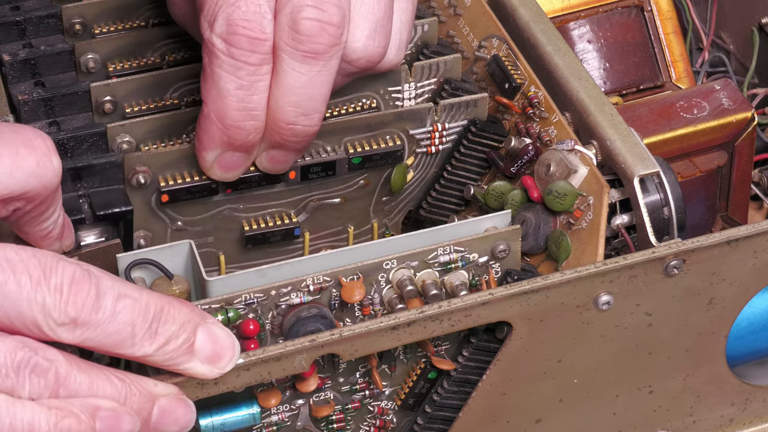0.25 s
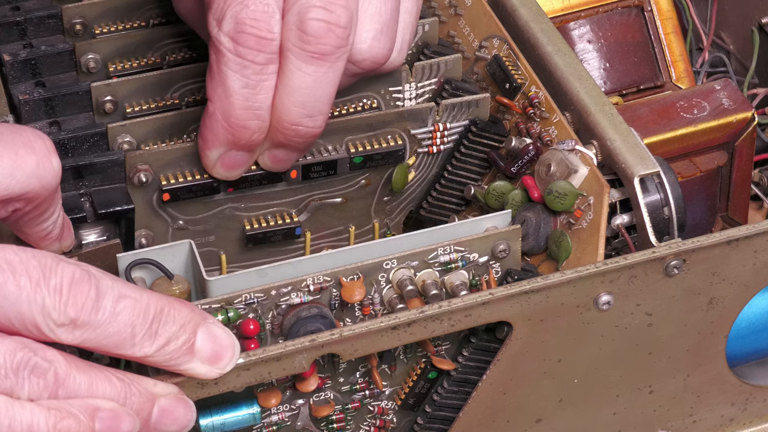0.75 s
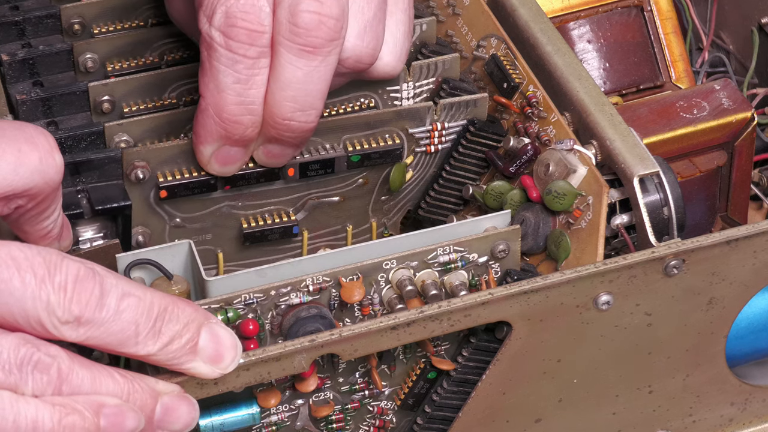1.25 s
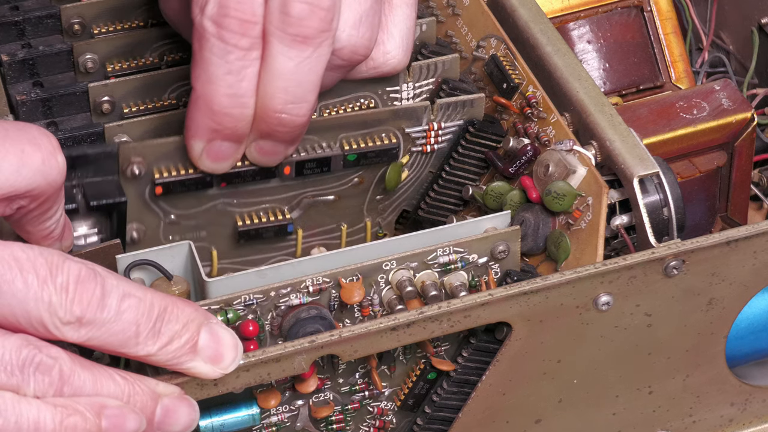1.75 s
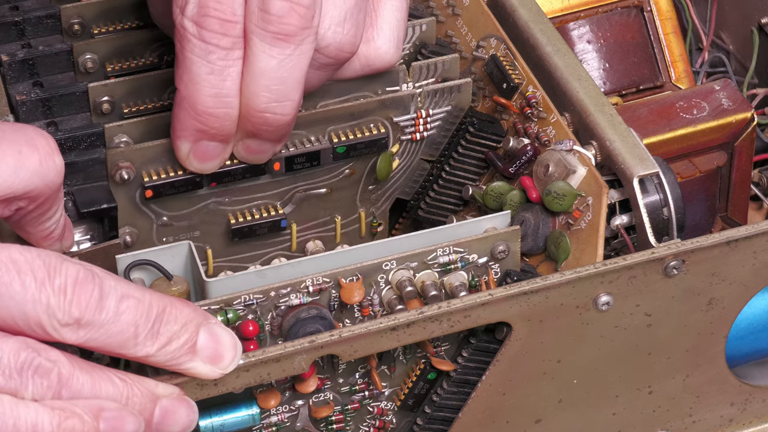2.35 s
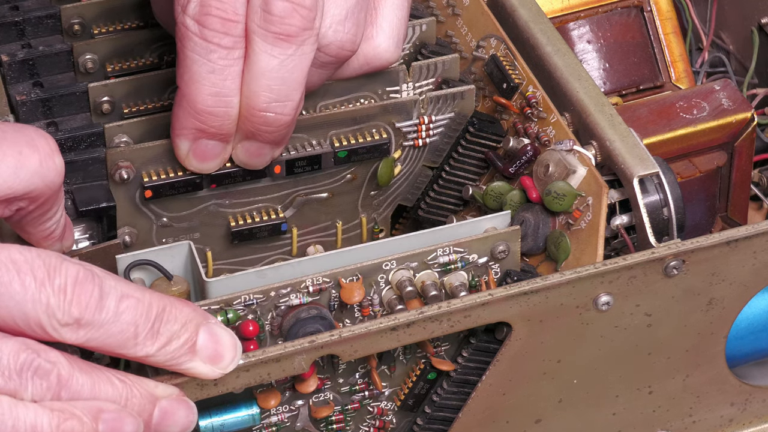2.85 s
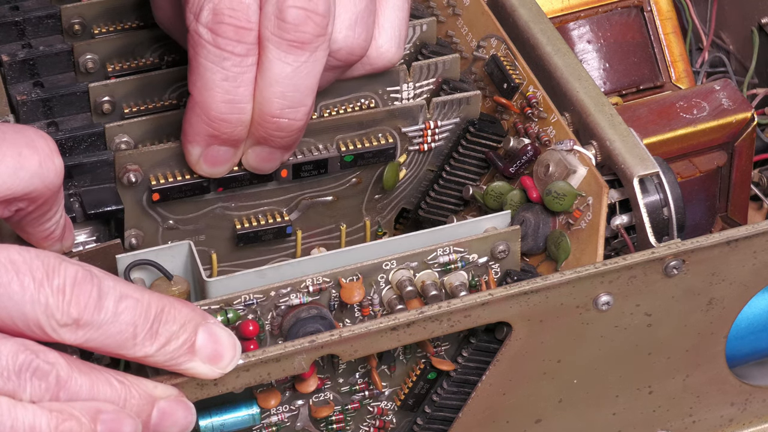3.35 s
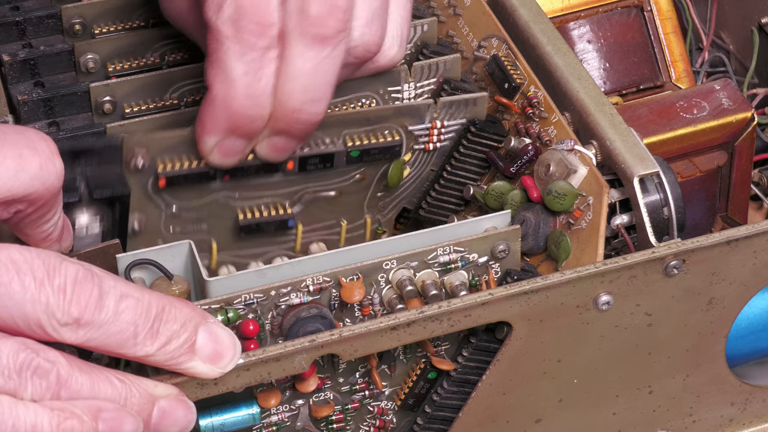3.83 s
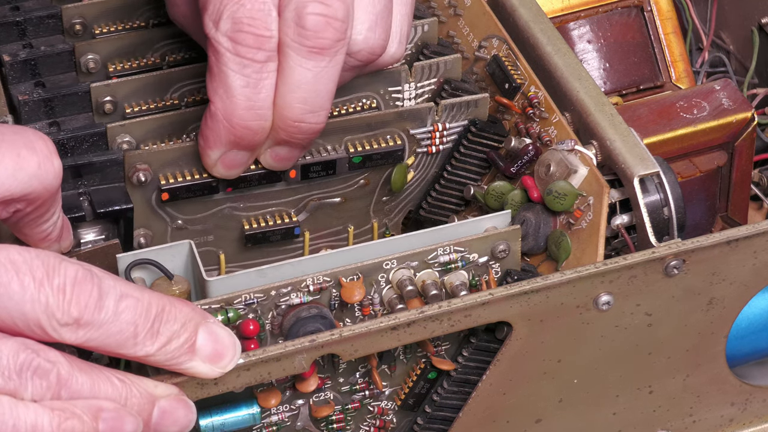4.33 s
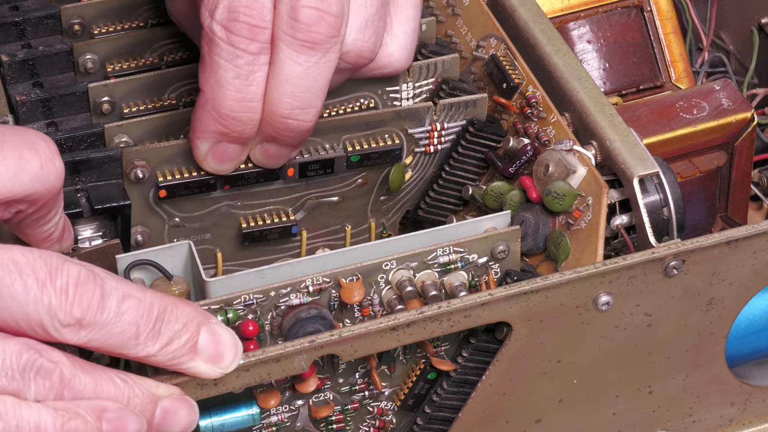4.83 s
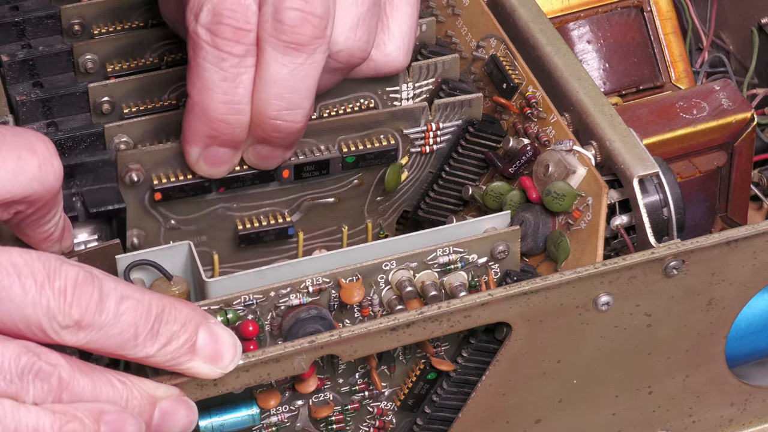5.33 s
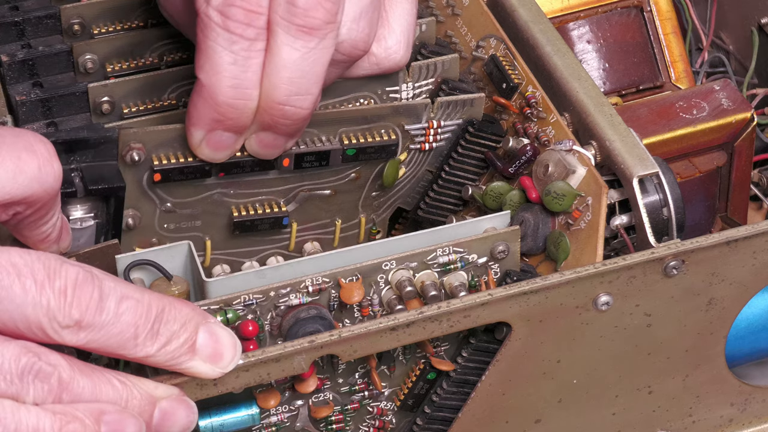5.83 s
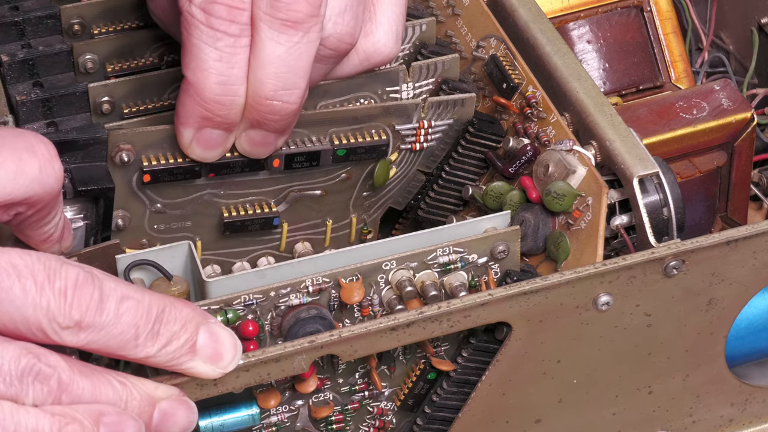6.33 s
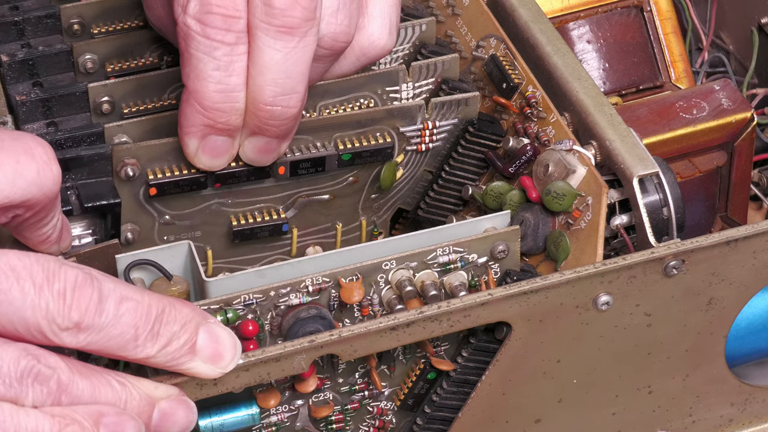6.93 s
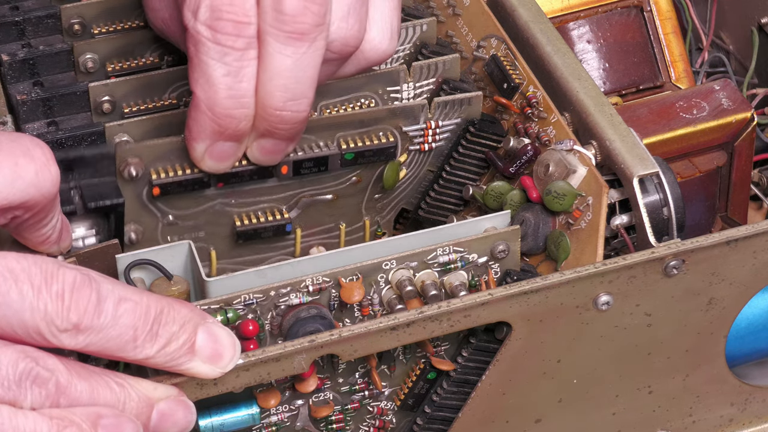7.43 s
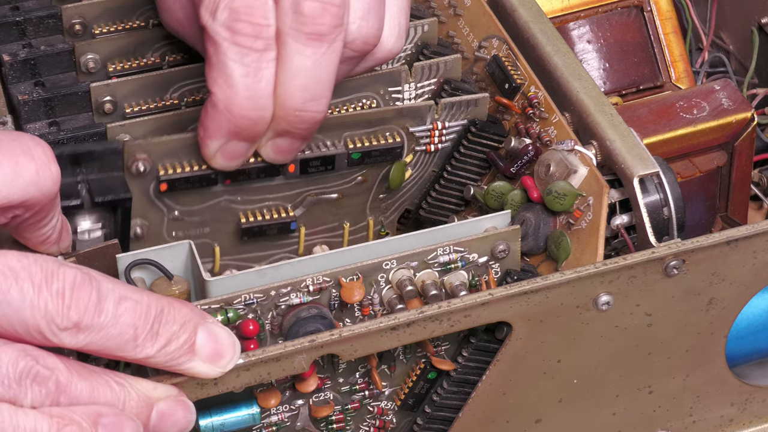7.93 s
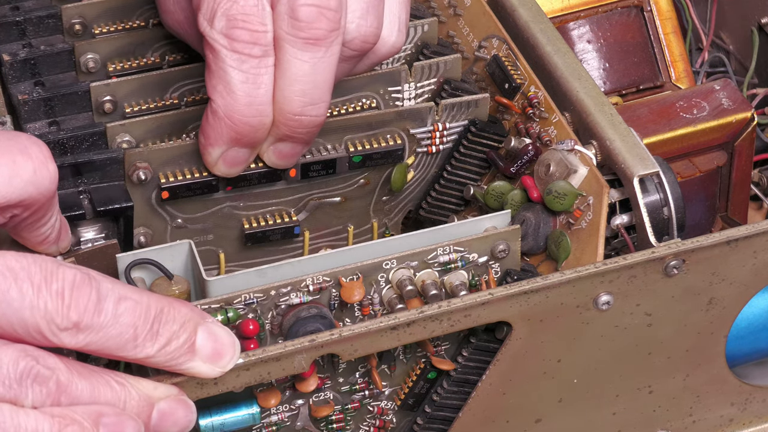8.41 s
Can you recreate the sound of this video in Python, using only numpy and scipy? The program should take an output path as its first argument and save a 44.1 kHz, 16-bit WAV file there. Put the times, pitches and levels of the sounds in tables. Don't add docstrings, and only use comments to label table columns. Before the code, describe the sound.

Quiet, detailed handling of a circuit card: an opening knock and squeak, then scattered taps, clusters of chirpy squeaks with gritty scraping, and sharp little clicks as contacts let go. The busiest squeaking comes before six seconds and again past seven. Recorded close with thin bass and a short small-room echo, over soft continuous fan air and electrical hum.

```python
import sys
import numpy as np
from scipy import signal
from scipy.fft import rfft, irfft, next_fast_len
from scipy.io import wavfile
from scipy.ndimage import uniform_filter1d

SR = 44100
rng = np.random.default_rng(int(sys.argv[2]) if len(sys.argv) > 2 else 0)


def to_wav(s):
    ch = np.atleast_2d(s).T
    pcm = np.round(np.clip(ch, -1, 1) * 32767)
    wavfile.write(sys.argv[1], SR, pcm.astype(np.int16))


def gain_from_decibels(decibels):
    exponent = np.asarray(decibels, float) / 20
    return 10 ** exponent


N = 382344

# start in seconds, length in seconds, slip rate at start in Hz, at end in Hz, peak in dB.
SWELLS = [
    (3.512, 0.045, 3350, 3260, -53),
    (7.48, 0.0291, 2193, 2373, -33.5),
    (1.962, 0.013, 3500, 3450, -44),
    (7.62, 0.036, 3450, 3390, -34.5),
]
EASES = [
    (0.125, 0.046, 2418, 2570, -37),
    (1.737, 0.029, 2421, 2317, -31.5),
    (3.984, 0.036, 2600, 2433, -31.5),
]
HOLDS = [
    (1.611, 0.034, 3563, 3206, -33.5),
    (1.765, 0.008, 2320, 2240, -33),
    (3.546, 0.016, 3320, 3060, -43),
    (5.078, .016, 3333, 3330, -31),
    (5.289, 0.014, 2300, 2440, -38.5),
    (7.665, .014, 3160, 3380, -41),
    (7.678, .016, 3470, 3340, -36.5),
]
JERKS = [(0.168, 0.029, 2496, 2550, -47), (1.345, 0.044, 3630, 3500, -51.5), (1.64, 0.034, 3410, 3210, -41),
         (1.974, 0.028, 3436, 3220, -34.5), (3.884, .02, 3300, 3360, -49.5),
         (4.41, 0.029, 3260, 3190, -59.5), (4.76, 0.025, 3200, 2900, -45), (4.782, .016, 2680, 2480, -56),
         (5.071, 0.012, 3310, 3450, -39), (5.098, 0.022, 3260, 3200, -43.5),
         (5.262, 0.013, 2600, 2400, -44), (5.303, 0.014, 2400, 2270, -56),
         (5.396, 0.021, 3500, 3400, -43.5), (5.407, 0.02, 3395, 3340, -42.5),
         (7.276, 0.04, 3470, 3250, -33), (7.694, 0.029, 3290, 3325, -41), (7.933, 0.03, 3560, 3360, -51),
         (7.97, 0.03, 3464, 3370, -47), (8.18, 0.025, 3240, 3360, -50.5), (4.014, 0.02, 2700, 2670, -42),
         (7.785, 0.023, 2597, 2650, -49)]
DOUBLES = [
    (2.112, 0.0215, 2156, 2240, -47),
    (5.271, 0.0198, 2063, 2210, -43.5),
    (7.47, 0.0108, 1735, 2130, -53.5),
]
# start in seconds, length in seconds, slip rate at the ends in Hz,
# lowest slip rate in Hz, peak in dB.
BENDS = [
    (5.162, 0.052, 2540, 2326, -29.5),
]
WHISTLES = [
    (1.782, .04, 2350, 2725, -42.5),
    (2.092, 0.023, 2740, 2500, -48.5),
    (3.635, 0.043, 2450, 2730, -56),
    (5.9, 0.056, 2480, 2470, -44.5),
    (6.89, 0.065, 2480, 2520, -65),
]
PRESSES = [
    (5.733, 0.024, 2545, 2394, -33.5),
    (5.832, 0.0364, 2805, 2420, -32),
    (5.759, .009, 2430, 2400, -46),
]
DRAGS = [
    (2.131, 0.026, 2255, 2240, -39),
    (3.872, 0.013, 3250, 3200, -39),
    (3.909, 0.014, 2400, 2330, -40),
]
# share of length spent rising, start in dB re peak, end in dB re peak,
# octave lift in dB, lift above the octave in dB, roughness factor, beating factor.
SWELL = (1.8, -14, -5, -1.5, 6, 1.3, 0.6)
EASE = (0.5, -20, -1, 1, -2.2, 1.34, 0.35)
HOLD = (2.5, -0.5, -3, 1.5, 2.2, 1, 0.7)
JERK = (0.36, -4, -18, 3.5, 0.6, 1.33, 1.06)
DOUBLE = (1.6, -5.5, -5.5, 21.5, 0, 2, 1)
BEND = (0.3, -19, 0, 0.5, 2.5, 0.6, 1)
WHISTLE = (2.2, -10, -4, -11, 0.1, 2.2, 0)
PRESS = (1, -21, -1.5, 2.5, -1, 1.6, 0.8)
DRAG = (-2, -2, -1, 3, -0.5, 2.06, 0.5)
OVERTONES_DB = ((-3.5, -16), (-9.5, -16))
UPPER_STEP_DB = (-9, -6.0)
FLUTTER_SHARE, BEATING_SHARE = (0.13, 0.31), (0.3, 0.36)
WOBBLE_SHARE = (0.005, 0.013)
SPRING_SPLIT_HZ, REFERENCE_DB = 2900, -33
BRIGHTENS_DB_PER_DB = (0.71, 0.99)
BEAT_HZ, FIRST_BEAT_S = 110.7, 0.0067
RISE_CURVE = 1.43
SETTLES = 0.847
EASED_FALL, REBOUND_SHARE = 2.44, 0.19

# start in seconds, length in seconds, hiss in dB,
# chatter in Hz, chatter in dB.
SCRAPES = [(0.215, .026, -69, 2200, -60), (1.597, 0.0096, -61, 3630, -38), (1.825, 0.095, -74, 2450, -57),
           (4.022, 0.052, -60, 2500, -56), (6.069, 0.048, -65, 3000, -58), (6.769, 0.1, -75.5, 2040, -69.5),
           (7.6, 0.12, -77.5, 2800, -68), (7.467, 0.034, -58, 1767, -51), (7.781, 0.076, -64, 2530, -52.5),
           (8.064, 0.057, -68, 2660, -59), (8.322, 0.037, -68.5, 3000, -72), (7.445, .022, -72, 3000, -75),
           (5.724, .04, -54, 2500, -59), (3.868, .05, -61, 3250, -60), (4.05, .01, -62, 2660, -70),
           (5.997, .012, -58, 2310, -64), (5.069, 0.048, -53, 2520, -62), (5.765, 0.076, -73, 2400, -66),
           (3.622, .09, -73, 2600, -75), (2.355, .06, -76, 2400, -80), (2.085, 0.047, -67, 3200, -58),
           (0.79, 0.029, -76, 1700, -64), (8.14, 0.087, -78, 2300, -61), (2.2, .05, -73, 1700, -58),
           (5.875, .085, -74, 2450, -70), (7.995, 0.036, -74, 2200, -59), (3.535, .06, -70, 2900, -63)]
SCRAPE_RISE_SHARE, SCRAPE_START_DB, SCRAPE_END_DB = 0.28, -6.5, -10
# frequency in Hz, density in dB per Hz.
RUB_SPECTRUM = [(1200, -26), (2600, -1), (3300, -8.5), (5000, -3.5), (6000, -15.5), (8500, -7),
                (9600, -24.5), (16000, -16)]

# time in seconds, board peak in dB, thud, ring and tick in dB re board.
BLOWS = [(0.008, -47.5, -10, -17, -5.5), (0.014, -50.5, -18, 7, -17), (0.233, -46.5, -2, -16, -16),
         (0.791, -47, -6.5, -24, -35), (2.177, -43.5, -16, -8.5, -29), (2.184, -43, -17, -19, -23.5),
         (2.2804, -44, -1, -3, -14.5), (2.769, -42.5, -12, -6, -27), (3.255, -43.5, -6.5, -5.5, -17.5),
         (3.714, -45, -18, -7.5, -4), (3.728, -66, -22, 6, 9), (3.864, -45, -6.5, -5.5, -17),
         (5.72, -44, -14, -0.5, -13), (5.959, -46, -23, -10, -21), (5.986, -44.5, -18.5, -7, -24),
         (6.621, -63, 1, -8, -15), (7.055, -47, -12.5, -10, -46), (7.646, -53, -3, -3, -15),
         (8.108, -45.5, -34, -13, -35), (8.134, -56, -0.5, 4, -9), (8.202, -49, -36, -20, -42),
         (5.976, -48.5, -16, -6, -20), (3.24, -58.5, -10, -13, -25), (2.756, -58, -5, -13, -16)]
BLOW_HZ = 850
# time in seconds, board peak in dB, thud and ring in dB re board, favoured board mode in Hz.
TAPS = [(0.241, -55, -26, 2, 880), (0.499, -53, -8, -37, 830), (0.636, -57.5, -14, -10, 480),
        (0.834, -64, -6, -8, 592), (1.854, -55, -21, -5, 1090), (1.951, -54.5, 1, -4, 855),
        (2.883, -54.5, -10, -19, 487), (4.144, -54.5, 1, -5.5, 550), (4.325, -47.5, -18, -34, 850),
        (4.7, -55, -21, -11.5, 859), (4.99, -60, -12, -7, 474), (5.004, -59.5, 3.5, 3, 460),
        (5.411, -49, 0.5, -5.5, 570), (5.607, -66, -4, -0.5, 468), (6.478, -53.5, -11, -18, 885),
        (7.954, -52, -6, -7.5, 895), (8.071, -53.5, -29, -13, 880), (1.196, -65, -5, -15, 850),
        (2.286, -48.5, -18, -27, 590), (5.089, -50.5, -30, -13, 850), (5.31, -53.5, -9, -3, 1030),
        (7.529, -53.5, -5, -14, 850), (7.832, -54.5, -16, -20, 870), (8.245, -55, -17, -29, 905),
        (8.082, -58, -27, -25, 880), (8.15, -57, -20, -20, 1000), (2.19, -51, -25, -15, 1130),
        (8.005, -59, -20, -20, 900)]
TAP_TICK_DB, TICK_PER_RING = -20, 0.54
# frequency in Hz, width in Hz, level in dB.
BOARD_MODES = [(261, 14, 0.5), (411.6, 21, 6.5), (592, 100, -0.5), (697, 32, -0.5), (832, 44, -0.5),
               (994, 90, 0), (1090, 24, 2.5)]
GUIDE_MODES = [(1660, 140, -3), (2400, 520, 4.5), (3500, 2080, 3.5), (5340, 1040, 1)]
PIN_MODES = [(7000, 240, 10.5), (8350, 490, 4), (10200, 920, -13), (12100, 1800, -2)]

# time in seconds, peak in dB, guide ring in dB re peak.
CRACKS = [(0.0148, -42, 6), (0.2314, -50, -4), (0.2423, -47, -4), (1.599, -52, 6), (2.1885, -50, 6),
          (2.2697, -61, -6), (2.2817, -38, 4), (2.3835, -60, -11), (2.662, -66, -10), (2.675, -63, -10),
          (3.2567, -41, 2.5), (3.511, -67, 7), (3.715, -35, -5), (3.7277, -36, -5), (3.786, -57, -10),
          (3.8645, -51, 5), (3.8700, -39.5, 7), (4.0462, -52, -1), (5.7199, -46, 8), (5.981, -53, 3),
          (5.9865, -47, 7), (5.998, -55, -3), (6.07, -59, 0), (6.479, -57.5, -6), (7.2165, -64, -3),
          (7.647, -43, 2), (7.955, -65, 6), (8.109, -57, 10), (8.134, -51, 5), (8.205, -63, 8),
          (8.328, -70, 9)]
SNAP_DECAY_S, GUIDE_DECAY_S = 0.001, 0.0023

# frequency in Hz, level in dB rms.
HUM_LINES = [(150.7, -74), (199.2, -75), (468, -70), (1277, -82.5), (1864, -92), (1339.3, -71.5),
             (2054, -81), (2143, -78.5), (2270, -90), (2412, -86), (3180, -93), (3530, -87.5)]
# frequency in Hz, density in dB per Hz.
AIR_SPECTRUM = [(53, -84), (90, -15), (139, -11), (284, -3.5), (429, -11.5), (467, -7.5), (499, -7),
                (1140, -12.5), (1380, -19), (1790, -19.5), (2090, -17.5), (2590, -24.5), (3590, -25.5),
                (6030, -33), (8000, -37.5), (9400, -34.5), (11000, -40), (14600, -38), (15300, -32),
                (16000, -33)]
AIR_DB = -61.5

ROOM_T60_S, WALL_CUT_HZ, ROOM_DB = 0.16, 6500, -14.5
DUCK_FROM_DB, DUCK_SHARE, RECOVER_DB_PER_S = -34.5, 0.87, 21.5


def squeaks(fade_s=0.0019, rub_db=-18.0, rub_tail_s=0.01):
    tone, pressure = np.zeros(N), np.zeros(N)
    jitter, flutter = drift(170), [drift(99) for k in range(3)]
    for short, rough, beats, s, slip_hz, *partial_db in strokes():
        at = np.arange(round(s[0] * SR), round(s[-1] * SR))
        t = at / SR
        gate = np.clip(np.minimum(t - s[0], s[-1] - t) / fade_s, 0, 1)
        beat = np.cos(2 * np.pi * BEAT_HZ * (t - s[0] - FIRST_BEAT_S))
        gate = gate * (1 + beats * BEATING_SHARE[short] * beat)
        rate_hz = np.interp(t, s, slip_hz) * (1 + rough * WOBBLE_SHARE[short] * jitter[at])
        phase = 2 * np.pi * np.cumsum(rate_hz) / SR
        levels = [np.interp(t, s, db) for db in partial_db]
        levels += [levels[2] + UPPER_STEP_DB[short] * k for k in (1, 2, 3)]
        levels[3] = np.maximum(levels[3], levels[1] + 2 * (levels[1] - levels[0]) - 28.0)
        for k, db in enumerate(levels):
            if (k + 1) * slip_hz.max() < 16000:
                strength = np.sqrt(2) * gain_from_decibels(db) * (1 + FLUTTER_SHARE[short] * flutter[k % 3][at])
                tone[at] += gate * strength * np.sin((k + 1) * phase)
        strongest_db = np.maximum(levels[0], levels[1])
        pressure[at] += gate * gain_from_decibels(-42.5 + 0.64 * (strongest_db + 39.0))
    r = np.exp(-1 / (rub_tail_s * SR))
    sliding = signal.lfilter([1 - r], [1, -r], pressure)
    return tone + gain_from_decibels(rub_db) * sliding * in_bands(rng.standard_normal(N), RUB_SPECTRUM)


def strokes():
    manners = ((SWELLS, SWELL), (EASES, EASE), (HOLDS, HOLD), (JERKS, JERK), (DOUBLES, DOUBLE),
               (BENDS, BEND), (WHISTLES, WHISTLE), (PRESSES, PRESS), (DRAGS, DRAG))
    share = np.linspace(0, 1, num=21)
    for rows, (rise, start_db, end_db, lift_db, third_db, rough, beats) in manners:
        top = np.clip(rise, .05, .95)
        rising = start_db * np.maximum(1 - share / top, 0) ** RISE_CURVE
        falling = end_db * np.maximum(share - top, 0) / (1 - top)
        for s, length, start_hz, end_hz, peak_db in rows:
            db = peak_db + rising + falling
            if rows is BENDS:
                glide = np.sin(np.pi * share)
            elif (rows is EASES or rows is PRESSES) and end_hz < start_hz:
                glide = 1 - (1 - share) ** EASED_FALL - REBOUND_SHARE * share ** 4
            else:
                glide = share ** SETTLES
            short = int(start_hz > SPRING_SPLIT_HZ)
            second, third = [db + re_db + lift_db + per_db * np.minimum(db - REFERENCE_DB, 0)
                             for re_db, per_db in zip(OVERTONES_DB[short], BRIGHTENS_DB_PER_DB)]
            slip_hz = start_hz + (end_hz - start_hz) * glide
            yield short, rough, beats, s + length * share, slip_hz, db, second, third + third_db


def scrapes():
    hiss, chatter, rough = np.zeros(N), np.zeros(N), drift(220)
    shape_db = np.array([SCRAPE_START_DB, 0, SCRAPE_END_DB])
    for start, length, hiss_db, hz, chatter_db in SCRAPES:
        s = start + length * np.array([0, SCRAPE_RISE_SHARE, 1])
        at = np.arange(round(s[0] * SR), round(s[-1] * SR))
        t = at / SR
        gate = np.clip(np.minimum(t - s[0], s[-1] - t) / 0.0023, 0, 1)
        hiss[at] = gate * gain_from_decibels(np.interp(t, s, hiss_db + shape_db))
        chatter_gain = gate * gain_from_decibels(np.interp(t, s, chatter_db + 2 * shape_db))
        chatter[at] = chatter_gain * rough[at] * np.sin(2 * np.pi * hz * t)
    grit = rng.standard_normal(N) * gain_from_decibels(1.8 * drift(45))
    return gain_from_decibels(3.5) * hiss * in_bands(grit, RUB_SPECTRUM) + gain_from_decibels(3.5) * chatter


def knocks():
    grains = rng.standard_normal(N) * gain_from_decibels(2.5 * np.minimum(rng.exponential(1, N), 4))
    modes = np.array(BOARD_MODES + GUIDE_MODES + PIN_MODES)
    part = np.repeat([1, 2, 3], [len(BOARD_MODES), len(GUIDE_MODES), len(PIN_MODES)])
    drive, struck = np.zeros((4, N)), np.zeros((len(modes), N))
    hits = [(*row, BLOW_HZ) for row in BLOWS]
    hits += [(s, db, thud, ring, TAP_TICK_DB + TICK_PER_RING * ring, hz) for s, db, thud, ring, hz in TAPS]
    reach_db = 2.0 * rng.standard_normal((len(hits), len(modes)))
    stretch = np.array([[1.7], [1.3], [.6], [.45]])
    for (s, peak_db, thud_db, ring_db, tick_db, favoured_hz), spot_db in zip(hits, reach_db):
        length_s = np.clip(0.01 + 0.000086 * (peak_db + 45.5), .003, .02) * stretch
        gentle = np.clip((-36 - peak_db) / 14, 0, 1)
        octaves_off = np.abs(np.log2(modes[:, 0] / favoured_hz))
        spot_db = spot_db - gentle * (part == 1) * np.minimum(28.3 * octaves_off, 15.0)
        at = np.arange(round(s * SR), min(round((s + 6 * length_s.max()) * SR), N))
        t = np.maximum(at / SR - s, 0)
        dying = np.exp(-t / length_s) * (1 - np.exp(-t / (0.12 * length_s)))
        contacts = dying * grains[at]
        contacts *= np.sqrt((dying ** 2).sum(axis=1) / (contacts ** 2).sum(axis=1))[:, None]
        part_db = np.array([[thud_db + 4.0], [22.0], [ring_db + 17.0], [tick_db + 17.5]])
        rattle = gain_from_decibels(peak_db + part_db) * contacts
        drive[:, at] += rattle * gain_from_decibels(np.array([[0], [-9.0 * gentle], [0], [0]]))
        struck[:, at] += gain_from_decibels(spot_db)[:, None] * rattle[part]
    soft = signal.butter(4, 1900, fs=SR, output="sos")
    struck[part == 1] = signal.sosfilt(soft, struck[part == 1] + 1e-18)
    drive[:2] = signal.sosfilt(soft, drive[:2] + 1e-18)
    rung = sum((-1) ** k * gain_from_decibels(db) * resonance(struck[k] + 1e-18, hz, width)
               for k, (hz, width, db) in enumerate(modes))
    between = gain_from_decibels(-17.5) * band(drive[1], 250, 2120) + gain_from_decibels(-9.5) * band(drive[3], 3300, 11800)
    thud = signal.sosfilt(signal.butter(4, 125, "high", fs=SR, output="sos"), band(drive[0], 104, 300))
    return thud + rung + between


def cracks():
    drive, t = np.zeros((2, N)), np.arange(600) / SR
    grit = rng.standard_normal((len(CRACKS), 2, len(t)))
    dying = np.exp(-t / np.array([[SNAP_DECAY_S], [GUIDE_DECAY_S]]))
    for (s, peak_db, ring_db), noise in zip(CRACKS, grit):
        burst = dying * noise
        burst *= np.sqrt((dying ** 2).sum(axis=1) / (burst ** 2).sum(axis=1))[:, None]
        start = round(s * SR)
        drive[:, start:start + len(t)] += gain_from_decibels(peak_db + np.array([[-1.0], [ring_db - 4.0]])) * burst
    return band(drive[0], 4600, 13000) + band(drive[1], 1400, 5400)


def room(x):
    t = np.arange(SR // 2) / SR
    spray = rng.standard_normal(len(t)) * np.clip((t - .004) / 0.0055, 0, 1)
    low = signal.sosfilt(signal.butter(1, WALL_CUT_HZ, fs=SR, output="sos"), spray)
    high = spray - low
    answer = low * gain_from_decibels(-60 * t / ROOM_T60_S) + high * gain_from_decibels(-60 * t / (0.66 * ROOM_T60_S))
    return signal.fftconvolve(x, gain_from_decibels(3.3) * answer / np.sqrt(np.sum(answer ** 2)))[:N]


def hum():
    t = np.arange(N) / SR
    unsteady = drift(1.34)
    lines = np.zeros(N)
    for k, (hz, db) in enumerate(HUM_LINES):
        level_db = db + 1.42 * np.roll(unsteady, 9001 * k)
        lines += np.sqrt(2) * gain_from_decibels(level_db) * np.sin(2 * np.pi * hz * t + k)
    air_gain = gain_from_decibels(AIR_DB - 4.5 + .5 * drift(0.24))
    return lines + air_gain * in_bands(rng.standard_normal(N), AIR_SPECTRUM)


def in_bands(white, spectrum):
    size = next_fast_len(N)
    hz = np.maximum(np.arange(size // 2 + 1) * SR / size, 1)
    table = np.array(spectrum)
    gain = gain_from_decibels(np.interp(np.log(hz), np.log(table[:, 0]), table[:, 1], left=-80, right=-80))
    return irfft(rfft(white, size) * gain / np.sqrt(np.mean(gain ** 2)), size)[:N]


def band(x, low_hz, high_hz):
    sos = signal.butter(2, [low_hz, min(high_hz, .45 * SR)], "band", fs=SR, output="sos")
    return signal.sosfilt(sos, x) * np.sqrt(SR / 2 / (high_hz - low_hz))


def resonance(x, hz, width_hz):
    r = np.exp(-np.pi * width_hz / SR)
    poles = [1, -2 * r * np.cos(2 * np.pi * hz / SR), r * r]
    return signal.lfilter([(1 - r * r) / 2, 0, (r * r - 1) / 2], poles, x)


def drift(rate_hz):
    r = np.exp(-2 * np.pi * rate_hz / SR)
    slow = signal.lfilter([1], [1, -2 * r, r * r], rng.standard_normal(N + SR))[SR:]
    return (slow - slow.mean()) / slow.std()


def scene():
    near = squeaks() + scrapes() + knocks() + cracks()
    return (near + gain_from_decibels(ROOM_DB) * room(near) + hum())[None]


def band_limit(x):
    return signal.sosfilt(signal.butter(12, 16470, fs=SR, output="sos"), x)


def record(dry):
    rounded = .09 * np.tanh(dry / .09)
    x = signal.sosfilt(signal.cheby2(8, 21.0, 106, "high", fs=SR, output="sos"), rounded)
    x = x + gain_from_decibels(-85.0) * rng.standard_normal(N)
    x = signal.sosfilt(signal.cheby2(14, 40, 16050, fs=SR, output="sos"), x)
    level_db = 10 * np.log10(uniform_filter1d(x[0] ** 2, size=221) + 1e-12)
    ramp_db = RECOVER_DB_PER_S * np.arange(N) / SR
    held_db = np.maximum.accumulate(level_db + ramp_db) - ramp_db
    r = np.exp(-1 / (0.01 * SR))
    duck_db = signal.lfilter([1 - r], [1, -r], -DUCK_SHARE * np.maximum(held_db - DUCK_FROM_DB, 0))
    return band_limit(x * gain_from_decibels(duck_db))


dry = scene()
out = record(dry)
to_wav(out)
```